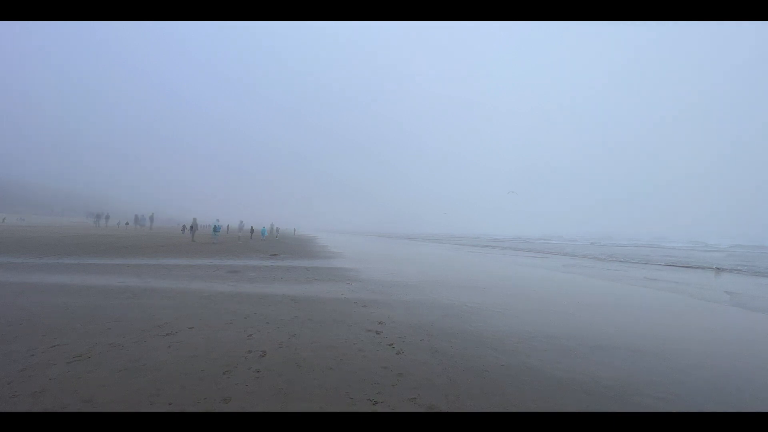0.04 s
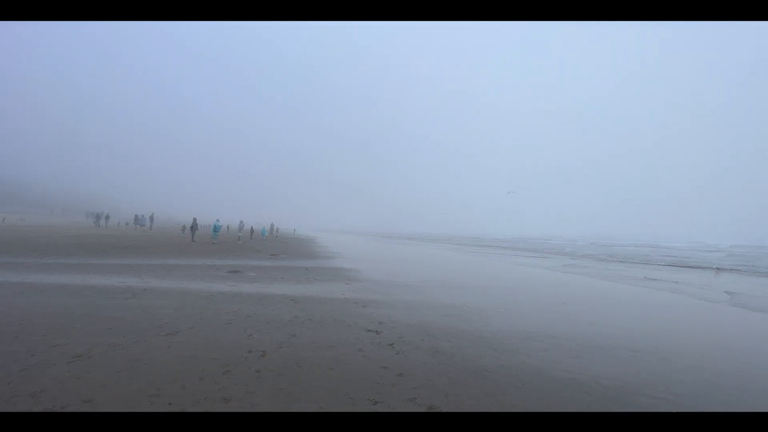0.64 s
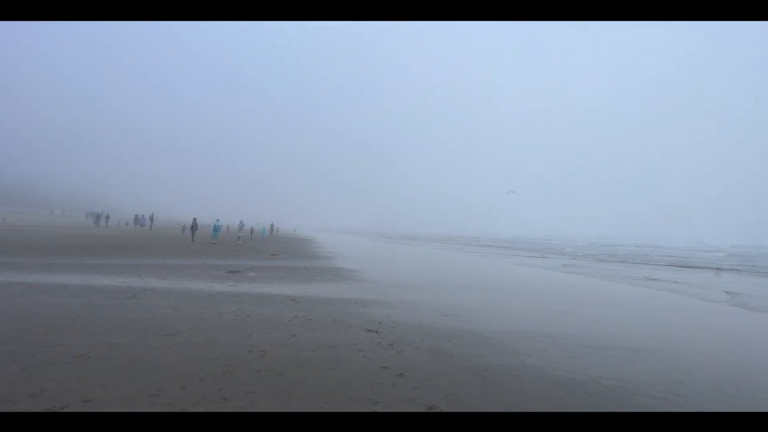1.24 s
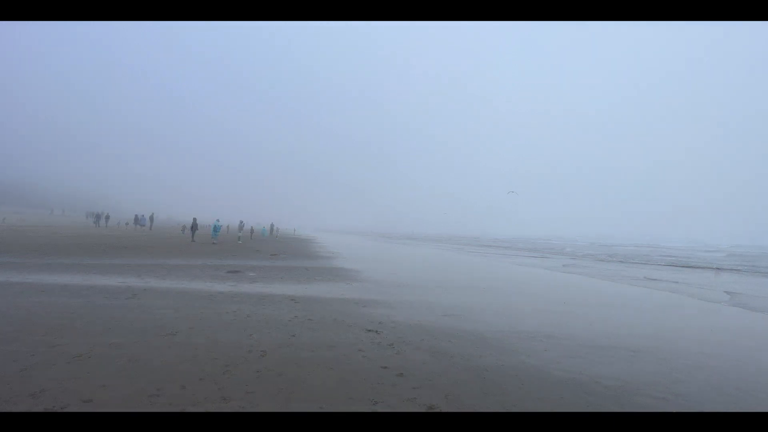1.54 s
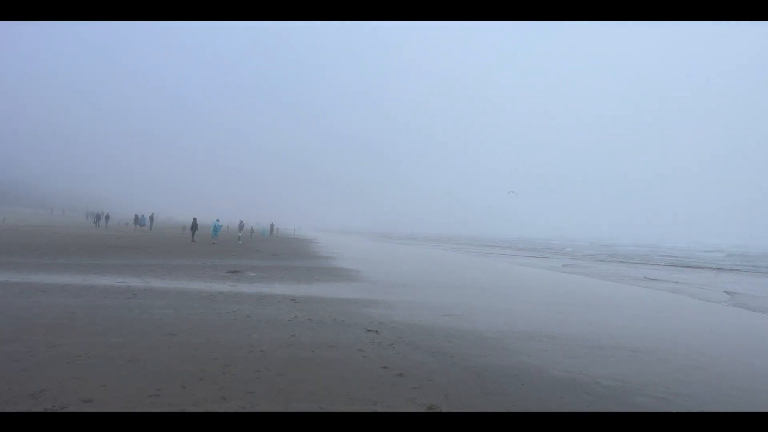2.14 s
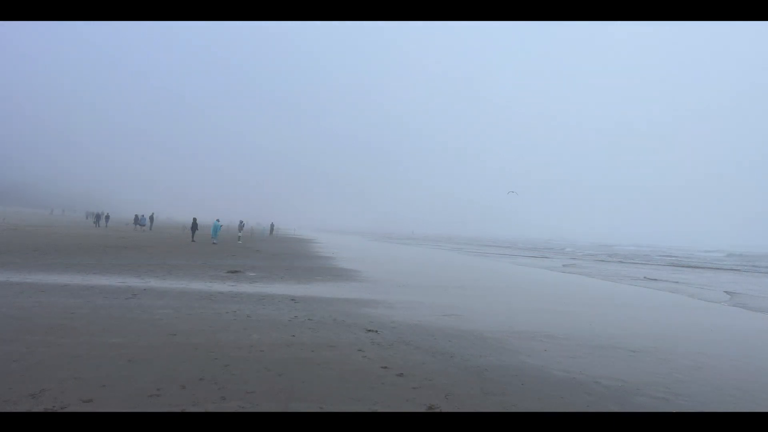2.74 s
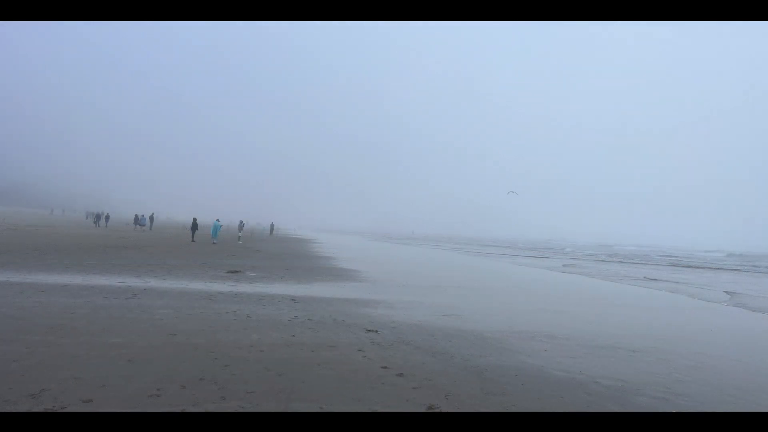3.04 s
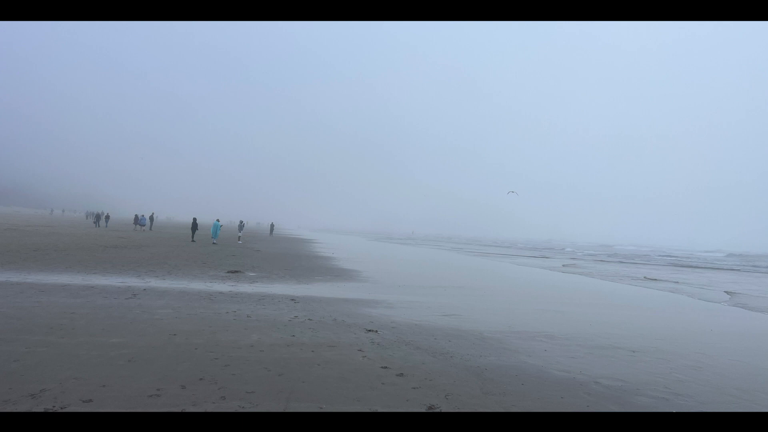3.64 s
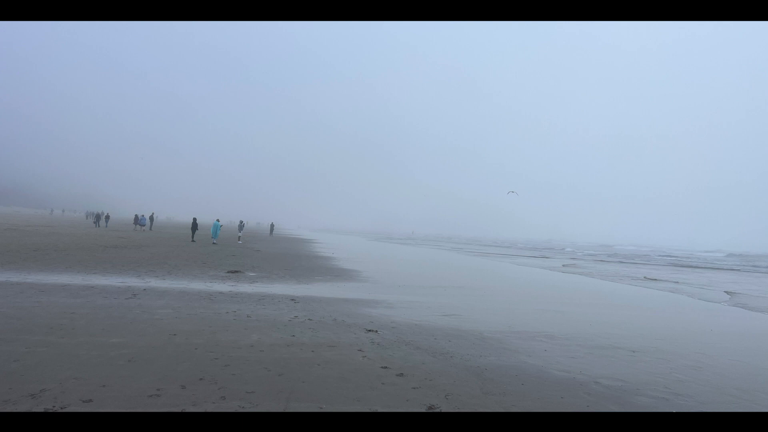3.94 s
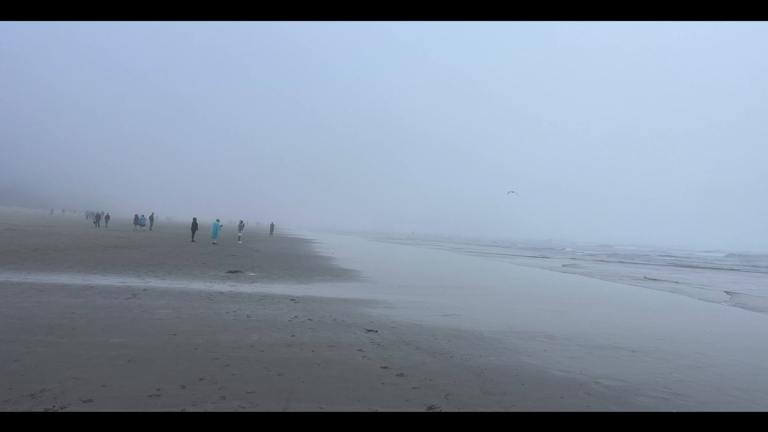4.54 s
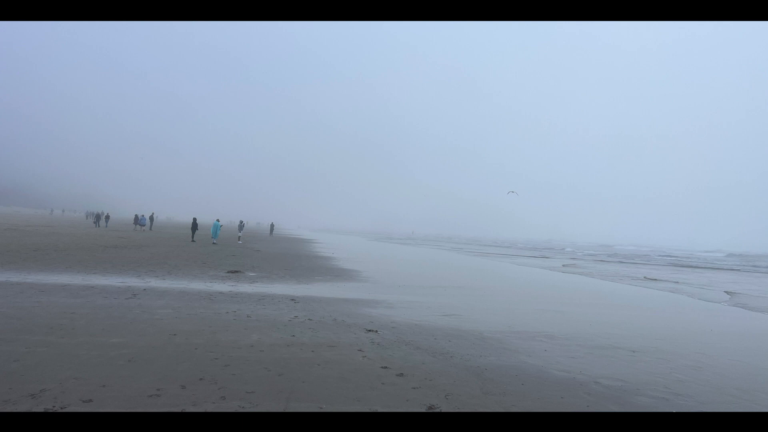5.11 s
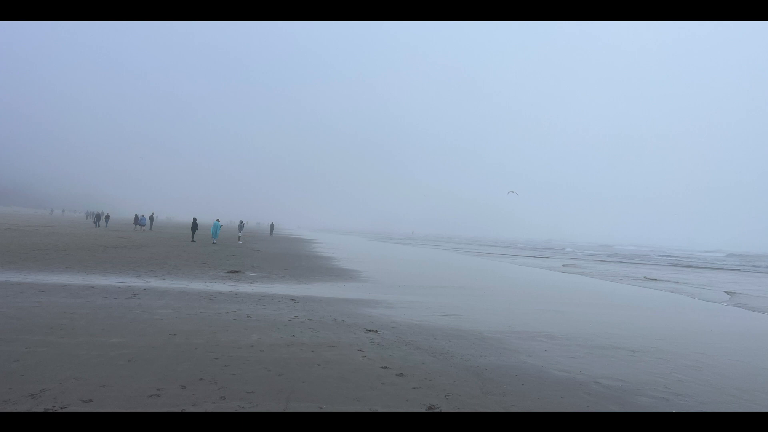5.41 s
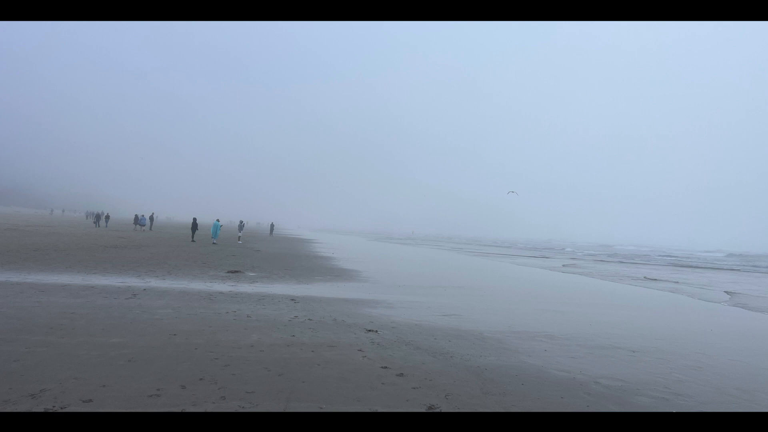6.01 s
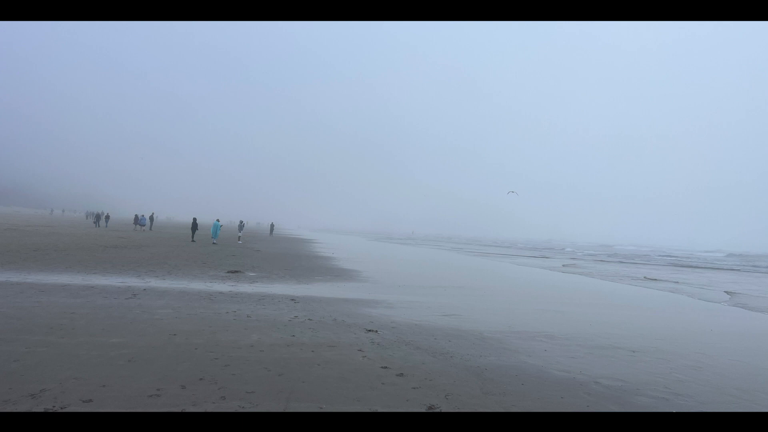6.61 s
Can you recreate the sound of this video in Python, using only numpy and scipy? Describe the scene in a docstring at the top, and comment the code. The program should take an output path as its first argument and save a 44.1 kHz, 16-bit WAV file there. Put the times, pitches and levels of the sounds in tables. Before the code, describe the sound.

On a wide, flat beach, distant breakers roar steadily while the foam of spent waves hisses closer by, slowly fading. Wind blows right on the hand-held microphone throughout, rumbling and fluttering as it swells in gusts and sinks in brief lulls. Short rasping puffs and low thumps strike at the start, bunch up again around the middle, and hit hard once more near the end.

```python
"""A wide, flat beach, heard from a hand-held camera with two microphone ports out in the wind.
Far off, breakers roar steadily; nearer, the foam of spent waves hisses on the sand as its bubbles burst.
Right on the microphone, eddies of wind rumble, bluster and flutter, swelling in gusts and sinking in lulls.
Single eddies flick the ports, short puffs rasp across them and hard buffets thump on both at once."""
import sys
import numpy as np
from scipy import signal
from scipy.fft import rfft, irfft, next_fast_len
from scipy.io import wavfile
from scipy.ndimage import uniform_filter1d, map_coordinates

SR = 44100
rng = np.random.default_rng(int(sys.argv[2]) if len(sys.argv) > 2 else 0)


def log_audio(samples):
    """Write samples as a 16-bit WAV file to the path given in sys.argv[1]."""
    # one column per channel
    frames = np.atleast_2d(samples).T
    # limit to full scale, then quantise
    limited = np.clip(frames, -1, 1)
    pcm = np.round(limited * 32767).astype(np.int16)
    wavfile.write(sys.argv[1], SR, pcm)


N = 298557

# Spectrum of air rasping across the ports: (frequency [Hz], relative level [dB])
RASP_SPECTRUM = [(60, -32), (250, -4.5), (480, -4.5), (700, 0.5), (1100, -6), (1450, -12.5), (2000, -19),
                 (4000, -48), (8000, -120)]


def amp(db):
    """Decibels to gain."""
    return 10 ** (np.asarray(db) / 20)


def unit(x):
    """Scaled to rms 1."""
    return x / np.sqrt(np.mean(x ** 2) + 1e-20)


def seconds():
    """The time of each sample."""
    return np.arange(N) / SR


def along(points, hz):
    """(frequency, value) points read at hz, on a log axis."""
    freqs, values = np.transpose(points)
    return np.interp(np.log(hz + 1), np.log(freqs + 1), values)


def filtered(x, response):
    """x through a complex frequency response."""
    size = next_fast_len(N + SR // 4)
    hz = np.fft.rfftfreq(size, 1 / SR)
    return irfft(rfft(x, size) * response(hz), size)[..., :N]


def wobble(per_s):
    """A smooth random curve with per_s knots a second."""
    knots = rng.standard_normal(4096)
    return map_coordinates(knots, [np.arange(N) * per_s / SR], mode="wrap")


def ragged(slow_db, fast_db):
    """A gain that flickers in quick bursts of bounded height, rms 1."""
    return unit(amp(slow_db * np.tanh(wobble(40)) + fast_db * np.tanh(wobble(150))))


def swell(at, length):
    """A bell-shaped rise and fall around a time, in seconds."""
    return np.exp(-2 * ((seconds() - at) / length) ** 2)


def burst(sound, at, length):
    """A short swell of a sound, with the same energy however the turbulence falls."""
    shape = swell(at, length)
    return np.sqrt(np.mean(shape ** 2)) * unit(shape * sound)


def churn(patchy_db):
    """Two unrelated noises whose level drifts in shared patches of time and pitch."""
    spectra = signal.stft(rng.standard_normal((2, N)), nperseg=512)[2]
    patches = uniform_filter1d(rng.standard_normal(spectra.shape[1:]), size=7, axis=0)
    patches = uniform_filter1d(patches, size=18, axis=1)
    pair = signal.istft(spectra * amp(patchy_db * unit(patches)), nperseg=512)[1]
    return unit(pair[:, :N])


def stereo_image(pair, colour):
    """Left and right take the first sound in common and the second with opposite signs."""
    # How alike left and right sound; the high foam hiss is the same in both:
    # (frequency [Hz], likeness [0-1])
    likeness = [(60, .5), (300, .47), (420, .32), (650, .6), (1100, .7), (1600, .54), (2350, .8),
                (2620, .7), (3100, .93), (5100, .93), (5400, 1)]
    # Left-right phase of the sound; the top rows spread the faintest high hiss wide:
    # (frequency [Hz], left lead [rad])
    left_lead = [(60, -.33), (170, -.05), (370, -.5), (490, 1.25), (680, .7), (1000, 1.15), (1180, .95),
                 (1400, 2.3), (1550, 3.8), (1780, 5.4), (2050, 5.6), (2600, 7.05), (4700, 6.75),
                 (5400, 6.28), (8500, 6.28), (10200, 3.14), (12000, 0), (12700, -.2), (13800, -3.14),
                 (15000, -6.28)]
    # Left-right balance: (frequency [Hz], left minus right [dB])
    balance = [(60, -1.1), (400, 0.3), (800, -1.5), (1400, -4.5), (2400, -5.5), (2750, 0.5), (3300, -1),
               (5000, 0)]

    def blend(hz):
        turn = np.arccos(np.clip(along(likeness, hz), 0, 1)) / 2
        shares = np.array([[np.cos(turn), np.sin(turn)], [np.cos(turn), -np.sin(turn)]])
        tilt_db = along(balance, hz)
        left = amp(tilt_db / 2) * np.exp(.5j * along(left_lead, hz))
        sides = np.array([left, 1 / left]) / np.sqrt((amp(tilt_db) + amp(-tilt_db)) / 2)
        return sides[:, None] * shares * colour(hz)
    return filtered(pair, blend).sum(axis=1)


def in_stereo(pair, spectrum):
    """Two unrelated sounds coloured by a spectrum and blended into left and right, rms 1."""
    return unit(stereo_image(pair, lambda hz: amp(along(spectrum, hz))))


def surf(roar_db=-35.3, foam_db=-46.5, ebb_db_per_s=0.4058, bubbles_per_s=2500, bubble_db=-9):
    """Breakers roar far out; nearer, countless bursting bubbles merge into a slowly ebbing foam hiss."""
    # Spectrum of the far breakers: (frequency [Hz], relative level [dB])
    roar_spectrum = [(15, -50), (50, -10), (130, 1), (400, -3.5), (520, -2.5), (650, -3.5), (1150, -7),
                     (1550, -14.5), (1740, -11.5), (2400, -13.5), (2650, -22), (4000, -32.5), (8000, -42),
                     (12000, -120)]
    # Spectrum of the foam on the sand: (frequency [Hz], relative level [dB])
    foam_spectrum = [(800, -18), (2000, -14), (2700, 0), (3300, 3), (4000, -1.5), (5600, -2.5), (7300, -3),
                     (8600, -7.5), (10000, -14), (11500, -14), (13000, -29), (15500, -31)]
    roar = amp(roar_db + 0.25 * wobble(2.79)) * in_stereo(churn(patchy_db=0.62), roar_spectrum)
    pops = (rng.random((2, N)) < bubbles_per_s / SR) * rng.standard_normal((2, N))
    fizz = churn(patchy_db=.5) + amp(bubble_db) * unit(pops)
    hiss_db = foam_db - ebb_db_per_s * seconds() + .15 * wobble(5.06)
    return roar + amp(hiss_db) * in_stereo(fizz, foam_spectrum)


def wind_levels(rumble_db=-36, bluster_db=-42, flutter_db=-41.5, rise_db_per_s=0.14):
    """Rumble, bluster and flutter in dB: a slowly rising breeze, lifted by gusts and dropped by lulls."""
    # Gusts: (peak time [s], length [s], rumble change [dB], bluster change [dB], flutter change [dB])
    gusts = [(.33, 0.42, 1.2, 6.5, -0.5), (1.123, 0.34, -2.5, 6, 0), (1.4, 0.77, 3.5, 2, 2.5),
             (2.245, 0.27, -0.5, 4, 6), (3, 0.23, 2, 0, -1), (3.355, 0.22, -1, 9.5, 6.5),
             (3.846, 0.2, 1, 5, -0.5), (4.62, 0.43, 0, 3, 3.5), (5.19, 0.18, 1, 7.5, 0),
             (6.263, 0.17, -3, 9, -0.5), (6.75, 0.2, 4.5, 5, 1)]
    # Lulls, in which the whole wind drops: (time [s], length [s], depth [dB])
    lulls = [(.85, 0.15, 1.5), (1.67, 0.048, 7.5), (1.947, 0.097, 6.5), (2.6, .15, 1.5), (3.075, 0.054, 4),
             (4.9, .12, 2), (5.648, 0.64, 1.5), (6, 0.14, 1)]
    lulls_db = sum(depth_db * swell(at, length) for at, length, depth_db in lulls)
    gusts_db = sum(np.outer(changes_db, swell(at, length)) for at, length, *changes_db in gusts)
    breeze_db = np.array([[rumble_db], [bluster_db], [flutter_db]]) + rise_db_per_s * seconds()
    return breeze_db - lulls_db + gusts_db


def wind(unlike_gain=0.78):
    """Large eddies rumble on both ports, mid-sized ones bluster, small ones flutter off the casing."""
    # Spectrum of the large eddies: (frequency [Hz], relative level [dB])
    rumble_spectrum = [(12, -62), (28, -17), (42, -5.5), (60, 0), (100, -1.5), (200, -10.5), (350, -19),
                       (700, -26.5), (2000, -78), (6000, -120)]
    # Spectrum of the mid-sized eddies: (frequency [Hz], relative level [dB])
    bluster_spectrum = [(30, -47), (90, -15), (160, -2), (270, -2.5), (420, -4), (620, -26), (1200, -56),
                        (4000, -120)]
    # Spectrum of the small eddies: (frequency [Hz], relative level [dB])
    flutter_spectrum = [(20, -45), (80, -20), (200, -9), (350, 3), (700, 4), (1100, -7), (1450, -2.5),
                        (2000, -35), (4000, -55), (8000, -120)]
    rumble_db, bluster_db, flutter_db = wind_levels()
    lumps = unit(amp(1.2 * wobble(25)))
    rumble = lumps * in_stereo(churn(patchy_db=0.46) * [[1], [unlike_gain]], rumble_spectrum)
    bluster = ragged(slow_db=4.5, fast_db=5.5) * in_stereo(churn(patchy_db=1.75), bluster_spectrum)
    flutter = ragged(slow_db=1.5, fast_db=6) * in_stereo(churn(patchy_db=1.0), flutter_spectrum)
    return amp(rumble_db) * rumble + amp(bluster_db) * bluster + amp(flutter_db) * flutter


def flaps(pitch_hz=860, swing_s=0.0008, wake_s=0.0033, wake_db=-17, gain_db=3):
    """The strongest small eddies each flick the ports once: a quick pressure swing, then a rough wake."""
    # Eddies flapping past the ports: (time [s], relative level [dB])
    eddies = [(0.0264, -22), (.3905, -21), (1.5015, -22), (1.7875, -23), (1.8112, -23.5), (1.9048, -21),
              (2.1435, -25), (2.968, -21.5), (3.1337, -24), (3.217, -25.5), (3.3495, -18), (4.566, -22.5),
              (4.605, -23), (6.208, -20)]
    grit = in_stereo(rng.standard_normal((2, N)), RASP_SPECTRUM)[0]
    pair = np.zeros((2, N))
    for at, db in eddies:
        t = seconds() - at
        hz = pitch_hz * np.exp(.08 * rng.standard_normal())
        swing = np.sin(2 * np.pi * hz * t) * np.exp(-(t / swing_s) ** 2)
        wake = amp(wake_db) * np.clip(t / swing_s, 0, 1) * np.exp(-np.abs(t) / wake_s) * grit
        pair[0] += amp(db + gain_db) * (swing + wake)  # common to left and right
    return stereo_image(pair, colour=lambda hz: 1)


def puffs(gain_db=-1):
    """Quick jets of air rasp across the ports, without a thump."""
    # Jets of air: (time [s], length [s], relative level [dB])
    jets = [(0.262, 0.035, -32.5), (0.363, 0.05, -34.5), (1.266, 0.048, -33), (1.336, 0.035, -32),
            (1.536, 0.044, -33.5), (1.82, 0.012, -33), (2.124, 0.022, -32), (2.764, 0.044, -33.5),
            (3.347, 0.018, -34), (3.575, 0.023, -33), (4.397, 0.033, -32.5), (4.59, 0.019, -33),
            (6.23, .03, -37), (6.64, 0.093, -34), (6.71, 0.017, -36)]
    rasp = ragged(slow_db=2.0, fast_db=6.0) * in_stereo(rng.standard_normal((2, N)), RASP_SPECTRUM)
    return sum(amp(db + gain_db) * burst(rasp, at, length) for at, length, db in jets)


def buffets(unlike_gain=0.82):
    """Hard gusts strike both ports at once, each a low thump with a burst of tearing air."""
    # Strikes on the microphone: (time [s], length [s], thump level [dB], tearing against thump [dB])
    strikes = [(0.228, 0.018, -22, -28), (.355, .03, -36, 3), (0.445, 0.034, -29, -10),
               (0.588, 0.059, -30, -25), (1.27, 0.047, -28.5, -11), (1.4, 0.065, -28, -25),
               (2.144, 0.025, -25.5, -8), (3.349, .008, -33, 4), (3.677, 0.036, -26.5, -20),
               (3.756, .03, -28.5, -7), (3.84, .06, -32, -2), (4.1, .04, -31.5, -5),
               (4.575, 0.027, -25.5, -6.5), (4.7, 0.049, -29, -14), (5.085, 0.023, -30.5, -17),
               (5.325, 0.034, -31, -22), (6.602, 0.042, -25.5, -3.5), (6.722, 0.034, -26, 1.5),
               (6.76, 0.026, -25, -2)]
    # Spectrum of the thump: (frequency [Hz], relative level [dB])
    thump_spectrum = [(12, -62), (32, -22), (62, 2), (115, -2), (200, -13), (330, -17), (600, -32),
                      (1500, -55), (5000, -120)]
    # Spectrum of the air tearing off: (frequency [Hz], relative level [dB])
    tearing_spectrum = [(40, -38), (150, 2.5), (300, 2), (500, -7.5), (900, -18.5), (1400, -28),
                        (3000, -57), (7000, -120)]
    thump = in_stereo(rng.standard_normal((2, N)) * [[1], [unlike_gain]], thump_spectrum)
    tearing = in_stereo(rng.standard_normal((2, N)), tearing_spectrum)
    return sum(amp(db) * (burst(thump, at, length) + amp(tearing_db) * burst(tearing, at, length))
               for at, length, db, tearing_db in strikes)


def scene():
    """The sea in the distance, behind the wind on the microphone."""
    return surf() + wind() + buffets() + puffs() + flaps()


def record(dry):
    """The camera cuts off steeply above its band limit."""
    top_hz = 15700
    return signal.sosfilt(signal.ellip(10, .1, 90, top_hz, fs=SR, output="sos"), dry)


dry = scene()
out = record(dry)
log_audio(out)
```